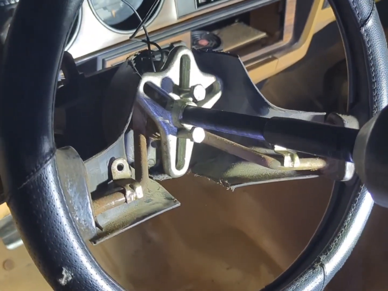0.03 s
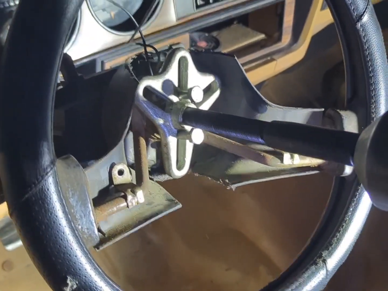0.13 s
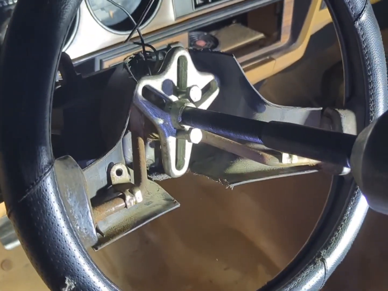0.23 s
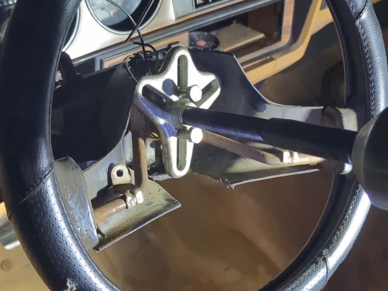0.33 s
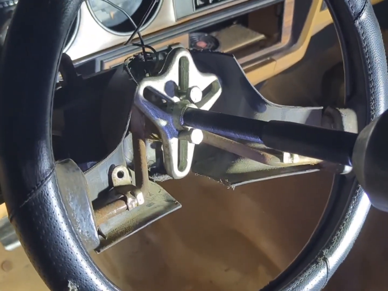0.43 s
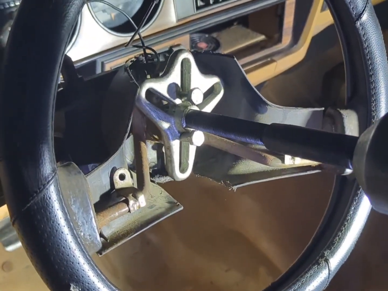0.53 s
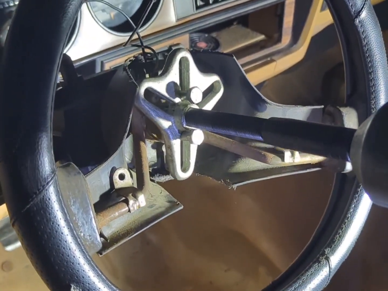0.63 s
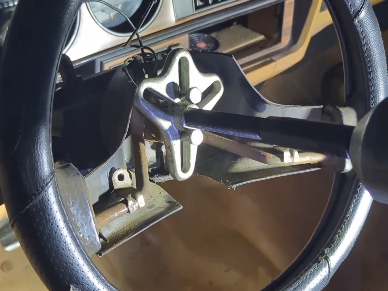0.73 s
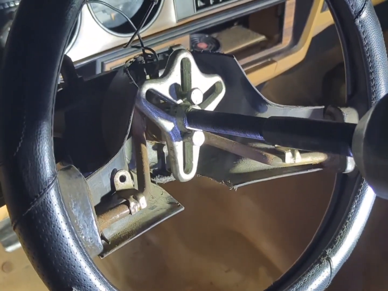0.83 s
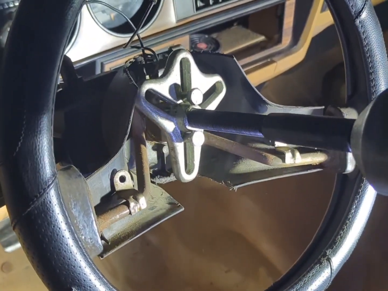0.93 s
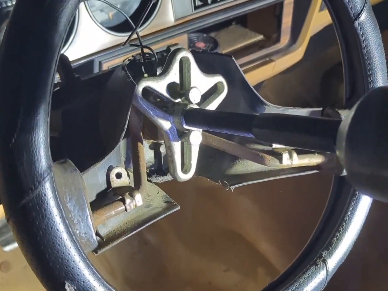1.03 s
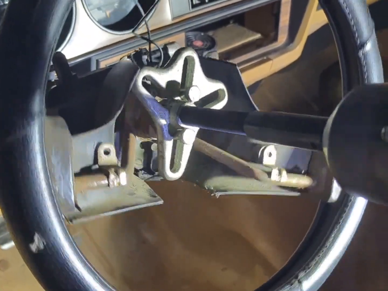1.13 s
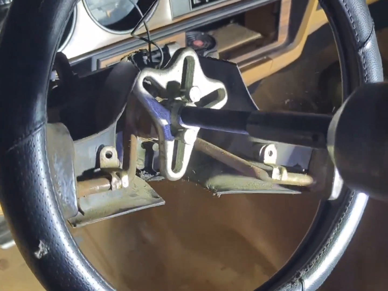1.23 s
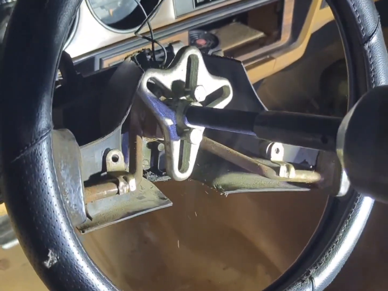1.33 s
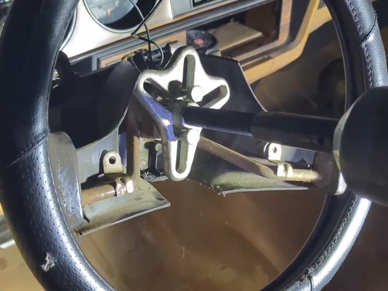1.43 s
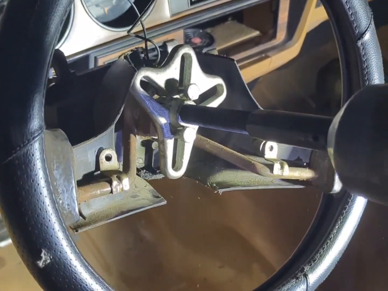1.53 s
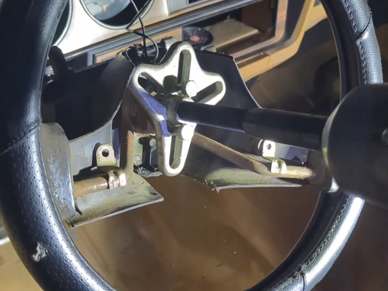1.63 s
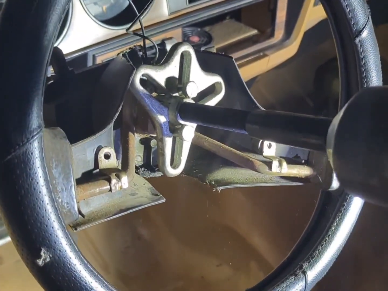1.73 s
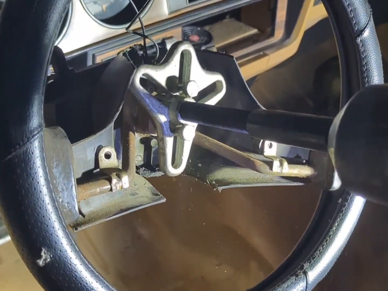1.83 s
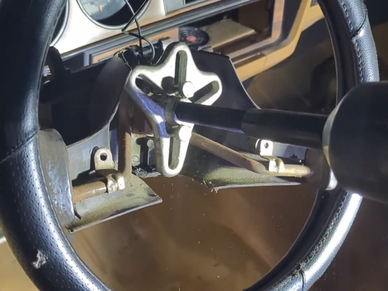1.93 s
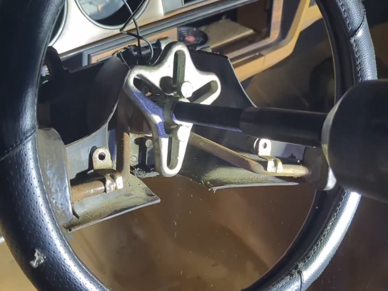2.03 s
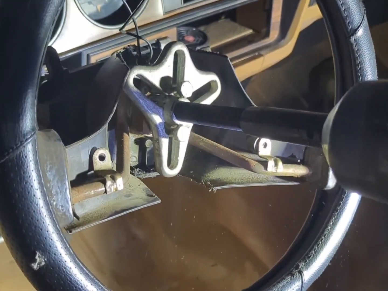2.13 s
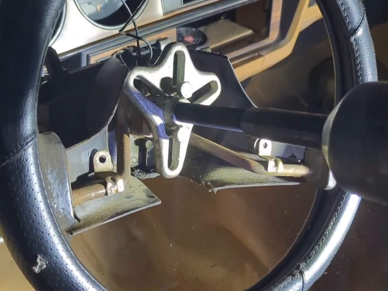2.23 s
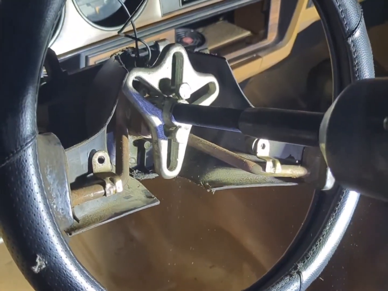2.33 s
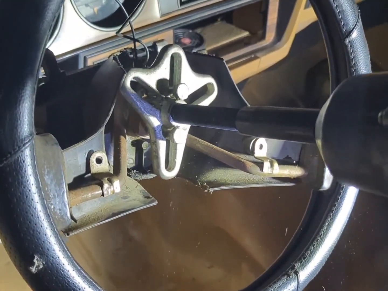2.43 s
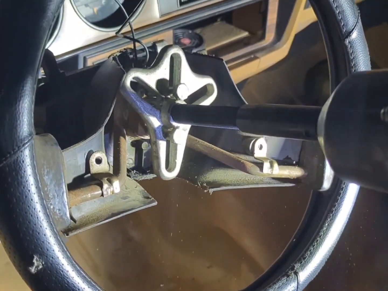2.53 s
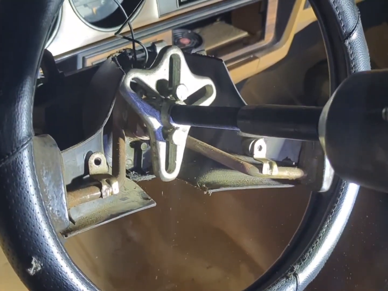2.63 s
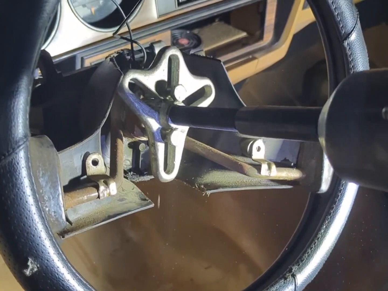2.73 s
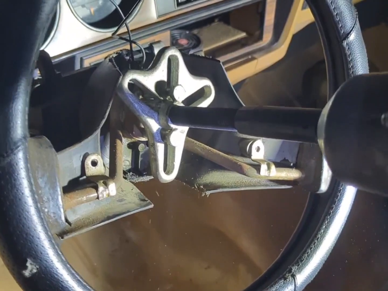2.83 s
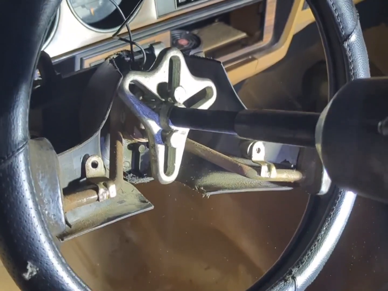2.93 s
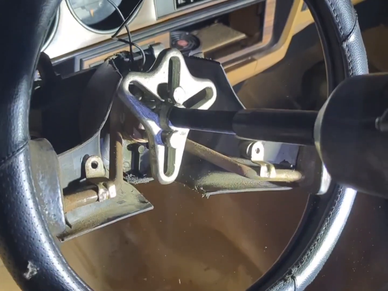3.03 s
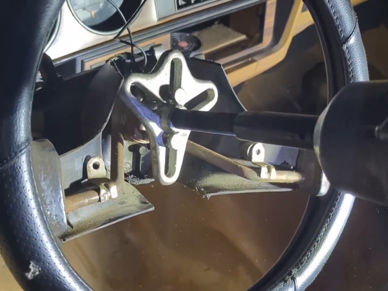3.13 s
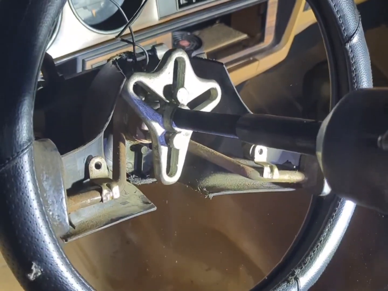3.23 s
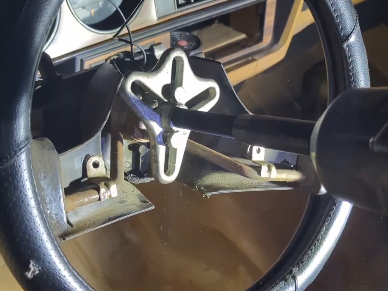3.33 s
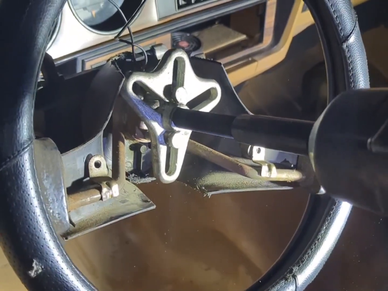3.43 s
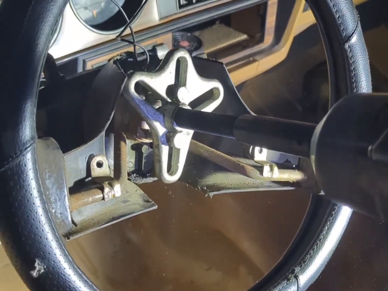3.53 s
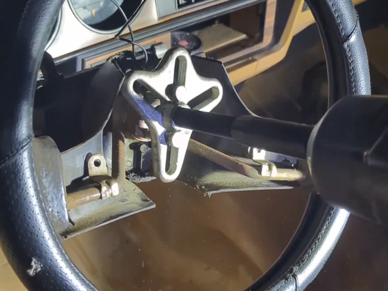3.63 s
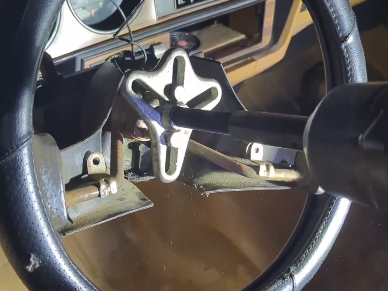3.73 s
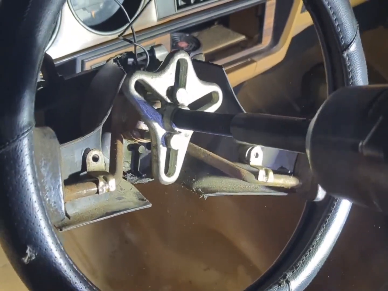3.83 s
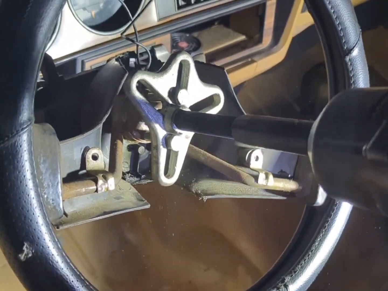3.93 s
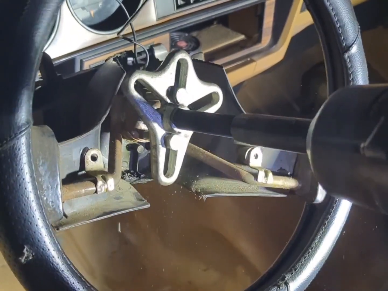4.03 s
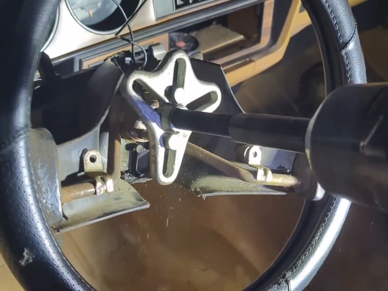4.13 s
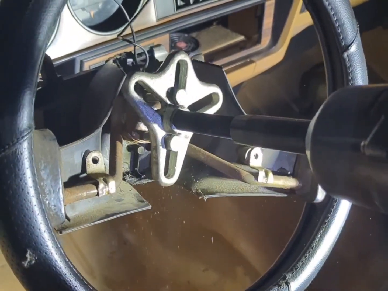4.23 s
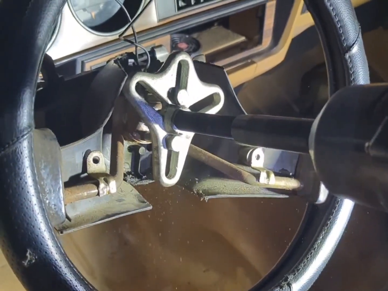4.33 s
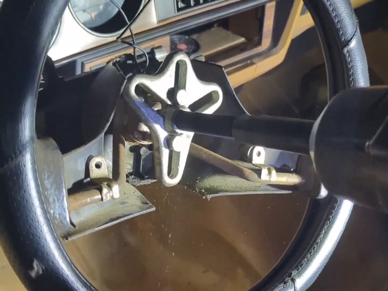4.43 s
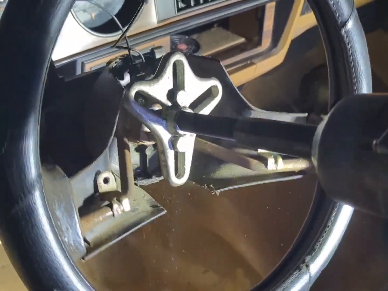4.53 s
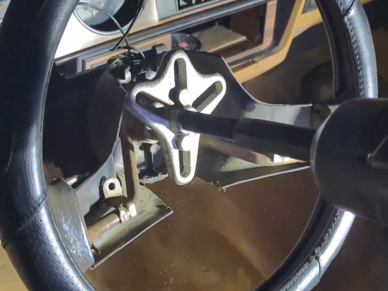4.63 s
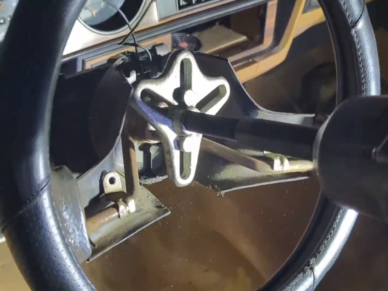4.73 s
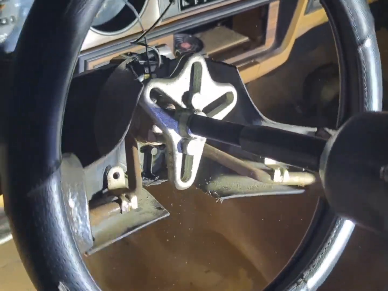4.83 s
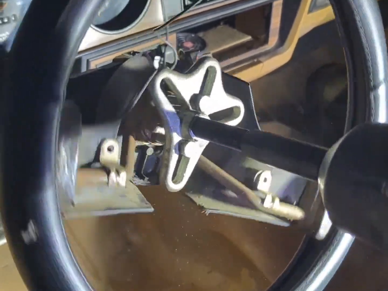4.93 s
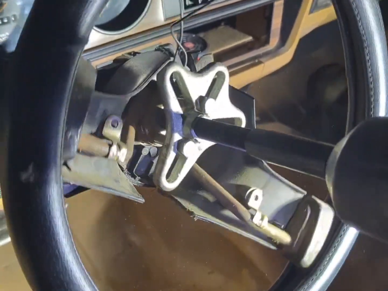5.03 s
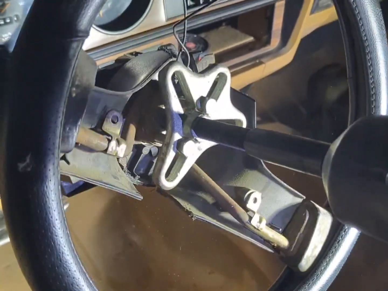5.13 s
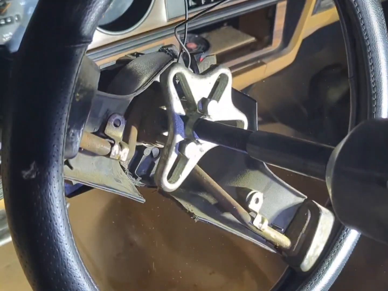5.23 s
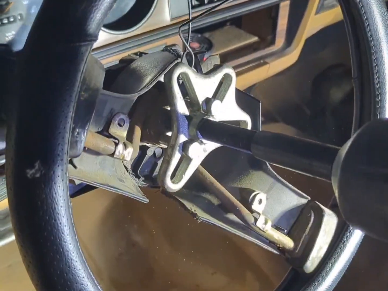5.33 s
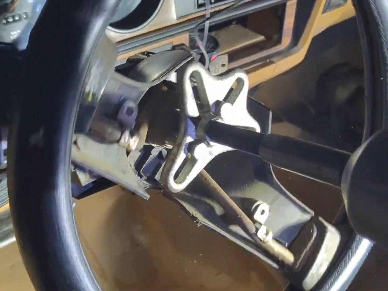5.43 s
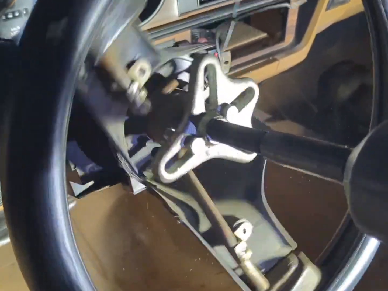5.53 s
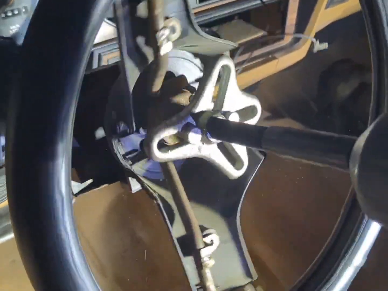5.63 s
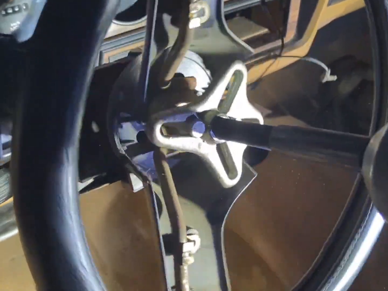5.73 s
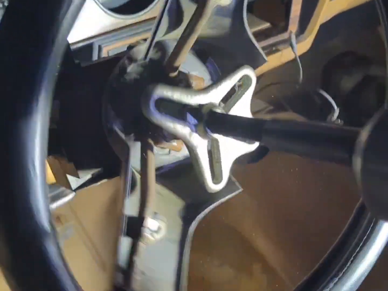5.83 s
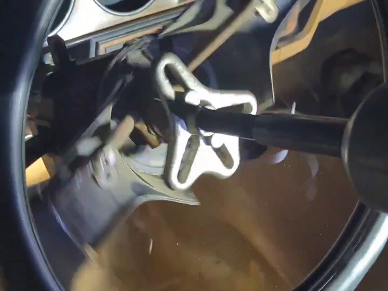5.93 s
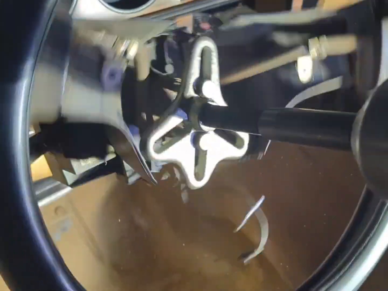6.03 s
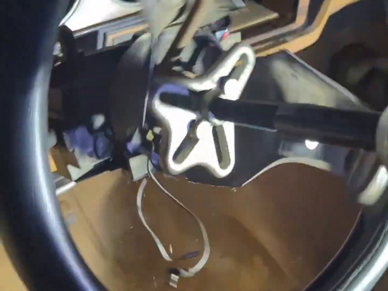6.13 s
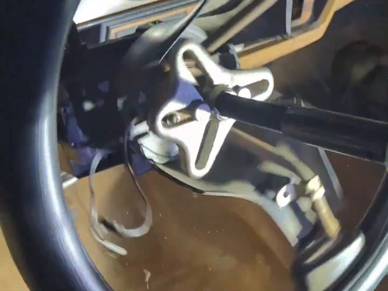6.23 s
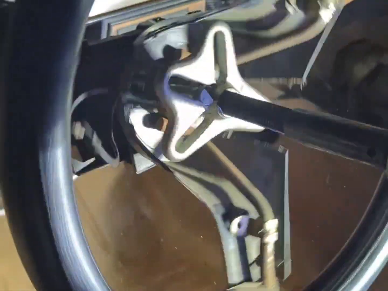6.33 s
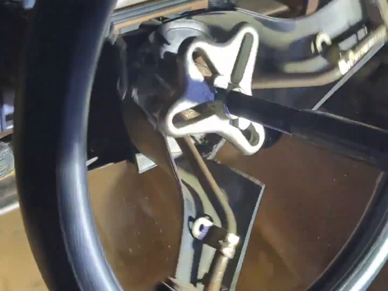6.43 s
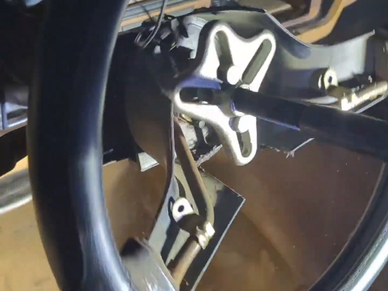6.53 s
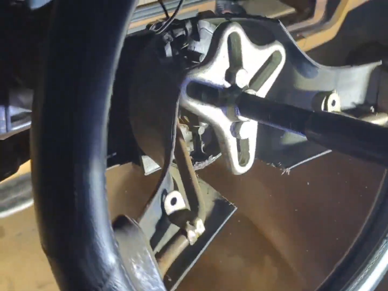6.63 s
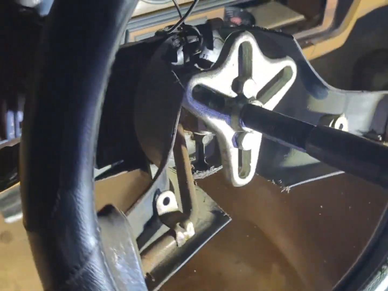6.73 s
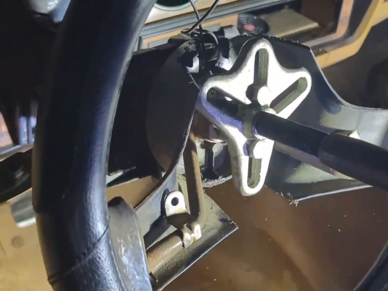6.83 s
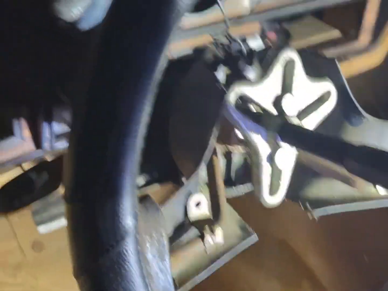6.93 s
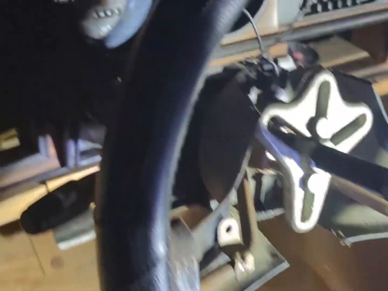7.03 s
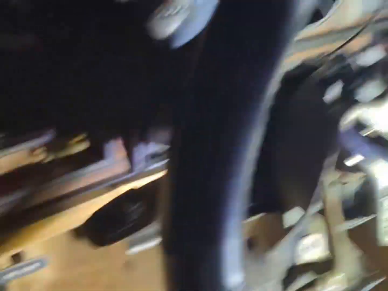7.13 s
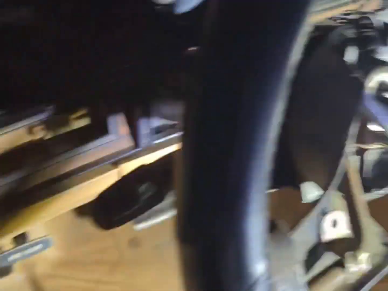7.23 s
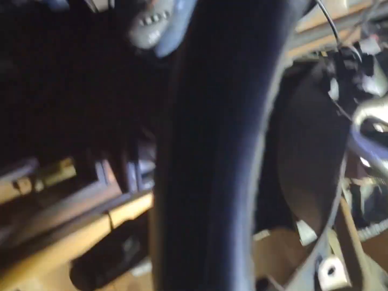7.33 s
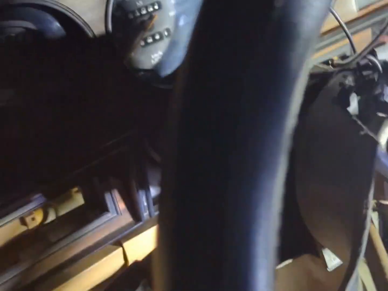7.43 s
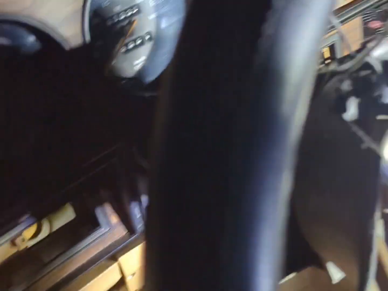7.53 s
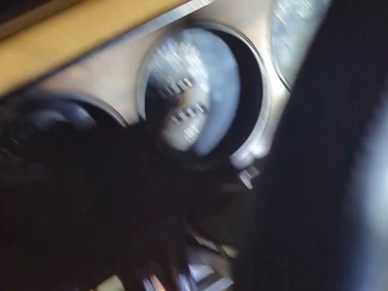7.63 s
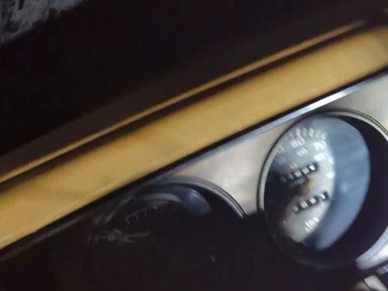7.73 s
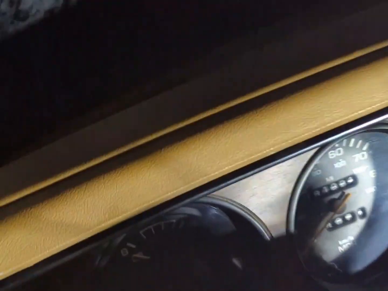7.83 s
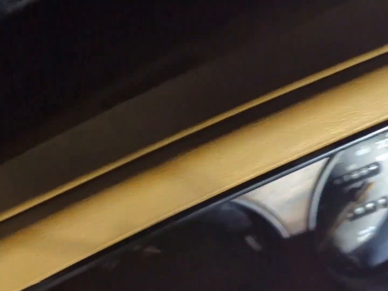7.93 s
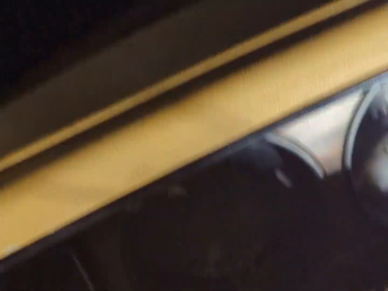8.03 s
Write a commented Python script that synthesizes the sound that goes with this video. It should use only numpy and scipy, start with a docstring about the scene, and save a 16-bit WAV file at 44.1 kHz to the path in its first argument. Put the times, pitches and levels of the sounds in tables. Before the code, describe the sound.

Electric motor whine, a brief rattling knock, a long harsh burst of metallic hammering, two short bursts, then a fading whir and light metal handling.

```python
"""A motor whines freely, then hammers in bursts with rattle and low boom; a hum, whir, clicks and rubs follow.
A cordless impact wrench turns the bolt of a steering-wheel puller inside a vehicle cab.
Shaft orders are sines; gears, steel, column and cloth are noise shaped by envelopes and resonances.
The freed wheel hums and whirs; the socket comes off with clicks and scrapes. A limiter ducks around loud blows."""
import sys
import numpy as np
from scipy import signal
from scipy.fft import rfft, irfft, next_fast_len
from scipy.io import wavfile
from scipy.ndimage import uniform_filter1d, minimum_filter1d

SR = 44100
rng = np.random.default_rng(int(sys.argv[2]) if len(sys.argv) > 2 else 0)


def inscribe(sig):
    """Save sig as 16-bit PCM at rate SR to the path in sys.argv[1].

    A 1-D sig is mono; a 2-D sig holds one channel per row.
    Samples are clipped to [-1, 1] before scaling.
    """
    pcm = np.round(np.clip(np.atleast_2d(sig).T, -1, 1) * 32767)
    wavfile.write(sys.argv[1], SR, pcm.astype(np.int16))


N = 356769
TIME = np.arange(N) / SR
HZ = np.fft.rfftfreq(8192, 1 / SR)

# Levels in spectra and modes are relative: body() scales each response to unit power.
# gear case spectrum: (frequency [Hz], level [dB])
GEAR_CASE = [(1500, -36), (2300, -16.5), (2720, -5.5), (3050, -9.5), (3400, -23.5), (5000, -43)]
# steel of socket, bolt and puller, spectrum: (frequency [Hz], level [dB])
STEEL = [(350, -1.5), (520, -3.5), (730, -5.5), (1050, -5), (1700, -3), (2700, -3), (3500, -6), (5000, -6),
         (6500, -9), (9000, -9), (15500, -15)]
# steel resonances: (frequency [Hz], width [Hz], boost [dB])
STEEL_MODES = [(1145, 21, 3.5), (1630, 56, 3.5), (1960, 40, 3), (2796, 99, -1.5), (655, 53, -1)]
# steering column spectrum: (frequency [Hz], level [dB])
COLUMN = [(60, -21), (85, -5), (130, -3.5), (220, -3.5), (280, -10.5), (430, -10.5), (560, -18.5),
          (850, -25.5), (2000, -35), (4000, -56.5)]
# steering column resonances: (frequency [Hz], width [Hz], boost [dB])
COLUMN_MODES = [(108.3, 6, 8), (148.2, 4.6, 7.5), (199.3, 12, 4.5), (241, 10, 4.5), (298.2, 8.2, 11.5)]
# bursts of hammering: (start [s], end [s], fall [dB/s], clatter [dB],
# treble relative to clatter [dB], column boom [dB])
BURSTS = [(1.346, 1.387, 541, -20.5, -1.5, -25.5), (1.75, 5.1, 168.5, -21.5, -3, -24),
          (5.637, 5.692, 424, -22.5, -5.5, -20.5), (5.9, 6.062, 420, -18, -6.3, -26)]
BURST_RISE_S = 0.01


def amp(db):
    """Decibels to gain."""
    return 10 ** (np.asarray(db) / 20)


def read(points, hz):
    """A spectrum joined by straight lines on a log-frequency axis."""
    point_hz, value = np.transpose(points)
    return np.interp(np.log(hz + 1), np.log(point_hz + 1), value)


def level(rows):
    """A (time, dB) curve as a gain, silent outside the curve."""
    time_s, db = np.transpose(rows)
    return amp(np.interp(TIME, time_s, db, left=-200, right=-200))


def swell(start, end, rise_s, fall_db_per_s):
    """A gain that rises linearly from start, holds until end and dies away exponentially."""
    fall_db = np.minimum(fall_db_per_s * np.maximum(TIME - end, 0), 200)
    return np.clip((TIME - start) / rise_s, 0, 1) * amp(-fall_db)


def add(mix, s, sound):
    """Mixes a stereo sound in at time s."""
    part = mix[:, round(s * SR):][:, :sound.shape[1]]
    part += sound[:, :part.shape[1]]


def noise():
    """Noise at two microphones: alike in the bass, nearly unrelated in the treble."""
    # (frequency [Hz], left-right correlation [1])
    likeness = [(30, 1), (100, 0.97), (190, 1), (300, 0.96), (480, 0.56), (700, -0.02), (1100, 0.37),
                (2500, 0.014), (16000, -0.15)]
    # (frequency [Hz], left minus right [dB])
    balance = [(150, 0), (300, -3), (600, -4.5), (1100, 1), (2200, 0.5), (4500, -.5), (9000, 0.2)]
    size = next_fast_len(N)
    hz = np.fft.rfftfreq(size, 1 / SR)
    a, b = rfft(rng.standard_normal((2, size)))
    same = np.clip(read(likeness, hz), -.99, .99)
    tilt = amp(read(balance, hz) / 2)
    mid = a * np.sqrt((1 + same) / 2)
    side = b * np.sqrt((1 - same) / 2)
    return irfft(np.array([(mid + side) * tilt, (mid - side) / tilt]), size)[:, :N]


def body(x, spectrum, modes=(), band=1):
    """Filters x by a minimum-phase response of unit power: a broad spectrum with resonances on it."""
    low_skirt = 1 + (spectrum[0][0] / (HZ + 1)) ** 6
    high_skirt = 1 + (HZ / spectrum[-1][0] / 1.2) ** 8
    gain = amp(read(spectrum, HZ)) * band / np.sqrt(low_skirt * high_skirt)
    for hz, width_hz, db in modes:
        gain = gain * np.sqrt(1 + (amp(db) ** 2 - 1) / (1 + (2 * (HZ - hz) / width_hz) ** 2))
    log_gain = np.log(gain / np.sqrt(np.mean(gain ** 2)) + 1e-5)
    mirrored = np.r_[log_gain, log_gain[-2:0:-1]]
    # the Hilbert transform of the log gain is the minimum phase
    response = np.fft.ifft(np.exp(np.conj(signal.hilbert(mirrored)))).real
    return signal.oaconvolve(x, response[None, :len(HZ)], axes=1)[:, :N]


def grains(per_s, spread_db, decay_s):
    """Envelope of many small random contacts, each dying quickly; mean power 1."""
    size = amp(spread_db * np.minimum(rng.exponential(1, N), 3))
    size = size * (rng.random(N) < per_s / SR)
    power = signal.lfilter([1], [1, -np.exp(-1 / (decay_s * SR))], size ** 2)
    return np.sqrt(power / power.mean())


def waver(per_s):
    """Random knots of unit deviation joined by straight lines, one curve per microphone."""
    knots = rng.standard_normal((2, int(N / SR * per_s) + 4))
    return np.array([np.interp(TIME * per_s, np.arange(len(k)), k) for k in knots])


def shifting(x, depth_db, width_hz=90, life_s=.06):
    """Patches of the spectrum swell and fade at random, at unchanged mean squared gain."""
    hop = 256
    z = signal.stft(x, nperseg=1024, noverlap=1024 - hop)[2]
    field = rng.standard_normal(z.shape)
    field = uniform_filter1d(field, max(1, round(width_hz * 1024 / SR)), axis=1)
    field = uniform_filter1d(field, max(1, round(life_s * SR / hop)), axis=2)
    gain = amp(depth_db * field / field.std())
    gain = gain / np.sqrt(np.mean(gain ** 2))
    return signal.istft(z * gain, nperseg=1024, noverlap=1024 - hop)[1][:, :N]


def lean(order):
    """Gain from how the wrench bears on the puller in the long burst; neutral outside the table."""
    # (time [s], boom [dB], treble of the chatter [dB], gear case [dB])
    bearing = np.array([(1.75, -1, -19, -1), (1.785, -7, 3, -3.5), (1.87, 2, -2, -5), (2.15, 2.5, -2, -4.5),
                        (2.56, -0.5, 0, 1.5), (2.66, -2, 0.5, -1.5), (3.8, -3, -0.5, -2),
                        (3.97, 2.5, -0.5, -4), (4.45, 2, -.5, -2.5), (4.9, -1, -6, -12), (5.1, 1.5, -1, -7),
                        (5.45, 12.5, 4, -6)])
    return amp(np.interp(TIME, bearing[:, 0], bearing[:, order], left=0, right=0))


def cab(cab_db=-56.5):
    """The quiet cab: steady noise, strongest in the bass."""
    # (frequency [Hz], level [dB])
    cab_spectrum = [(25, -2), (50, -2.5), (105, 0), (140, -7.5), (300, -16), (666, -13), (1050, -17.5),
                    (1300, -15), (2850, -25), (15500, -38.5)]
    return amp(cab_db) * body(noise(), cab_spectrum)


def motor(jitter=0.00098, flutter_db=3.5, gear_trim_db=1.0, case_trim_db=-1):
    """Shaft orders whine over meshing gears, whose case resonates under load; the speed controller sings."""
    # trigger pulls: (on [s], takes up the load [s], off [s], fall [dB/s], gear noise [dB],
    # gear case [dB], strain peak [dB])
    pulls = [(-.1, 1.29, 1.425, 607, -31.5, -32.5, -24.5), (1.699, 1.76, 5.1, 201, -33, -28.5, -17),
             (5.525, 5.565, 5.69, 382, -32.5, -29.5, -25), (5.871, 5.885, 6.08, 360, -25, -32, -26)]
    # unbraked motor: (time [s], shaft speed [Hz])
    free_shaft = [(0, 340.7), (.3, 341.7), (.68, 343), (.8, 341.8), (1.08, 345), (1.16, 340.5), (1.3, 328),
                  (1.75, 336)]
    # teeth and slots passing: (multiple of shaft speed [1], level [dB])
    whine_orders = [(3, -10.5), (7, -10.5), (8, -1.5), (9, -6.5), (18, -26.5), (21, -10), (22, -2.5),
                    (23, -27.5), (24, 5), (25, -21.5), (26, -18), (27, -8.5), (43, -28.5), (45, -8.5)]
    # meshing gears: (frequency [Hz], level [dB])
    gear_spectrum = [(30, -13), (50, 1.5), (90, -8.5), (150, -1.5), (260, -9.5), (420, -7.5), (650, -15),
                     (1000, -9), (1300, -14), (1600, -8.5), (2400, -8.5), (3400, -12.5), (9500, -16.5),
                     (15500, -26)]
    # gear resonances: (frequency [Hz], width [Hz], boost [dB])
    gear_modes = [(980, 76, 1), (1160, 49, 5.5), (210, 43, 4)]
    # speed controller, trigger part way down: (start [s], end [s], level [dB])
    chopper_spans = [(1.28, 1.46, -48), (1.476, 1.54, -44), (1.585, 1.73, -45), (5.517, 5.635, -45),
                     (5.861, 5.895, -45)]
    # (multiple of chopper_hz [1], level [dB])
    chopper_parts = [(.5, -33), (1, 0), (1.5, -23.5)]
    spin_up_s, hammer_sag_hz, coast_sag_hz = 0.017, 23.4, 150
    strain_rise_s, strain_fall_s = 0.074, .03  # the case swells while the hammer spring winds up
    whine_db, full_speed_hz, whine_db_per_hz = -39.5, 343.1, 0.54  # the whine fades as the shaft slows
    chopper_hz, chopper_rise_s, chopper_fall_db_per_s = 7860, 0.0076, 450

    running = gear_level = case_level = 0
    for on, loaded, off, fall, mesh_db, ring_db, strain_db in pulls:
        run = swell(on, off, spin_up_s, fall)
        strain = np.exp(-np.maximum((loaded - TIME) / strain_rise_s, (TIME - loaded) / strain_fall_s))
        running = running + run
        gear_level = gear_level + run * amp(mesh_db)
        case_level = case_level + run * (amp(ring_db) + amp(strain_db) * strain)
    case_level = case_level * running * lean(order=3)

    braking = sum(swell(start, end, BURST_RISE_S, fall) for start, end, fall, *_ in BURSTS)
    shaft_hz = np.interp(TIME, *np.transpose(free_shaft))
    shaft_hz = shaft_hz - hammer_sag_hz * braking - coast_sag_hz * (1 - running)
    whine_level = running * amp(whine_db + whine_db_per_hz * (shaft_hz - full_speed_hz))
    turns = np.cumsum(shaft_hz * (1 + jitter * waver(60)[0])) / SR
    whine = 0
    for multiple, db in whine_orders:
        flutter = amp(db + flutter_db * waver(25))
        whine = whine + flutter * np.sin(2 * np.pi * (multiple * turns + rng.random()))

    mesh = shifting(noise() * grains(2500, 1.5, 0.0018), depth_db=4.0, width_hz=70)
    gears = body(mesh, gear_spectrum, gear_modes)
    case = body(noise() * grains(1000, 0.74, 0.0022), GEAR_CASE, [(2730, 40, 3.1)])
    case = shifting(case, depth_db=4.0, width_hz=60, life_s=.08)

    chopper = chopper_level = 0
    mic_phase = np.array([[0], [.1]])  # cycles
    for multiple, db in chopper_parts:
        cycles = multiple * chopper_hz * TIME + mic_phase
        chopper = chopper + np.sqrt(2) * amp(db) * np.sin(2 * np.pi * cycles)
    for start, end, db in chopper_spans:
        chopper_level = chopper_level + amp(db) * swell(start, end, chopper_rise_s, chopper_fall_db_per_s)
    return (amp(gear_trim_db) * gears * gear_level + amp(case_trim_db) * case * case_level
            + whine * whine_level + chopper * chopper_level)


def clicks(click_trim_db=2, tick_s=0.0015, wash_db=-13, wash_s=0.026, ring_trim_db=-12, bright_hz=4000):
    """Light metal contacts: a noise tick, its reflections as a noise tail, and the socket's ringing modes."""
    # loose metal touching: (time [s], level [dB], ring share [dB], brightness [dB])
    touches = [(0.575, -25, -18, -13), (1.534, -46, -10, -8), (1.572, -47.5, -8, -8), (5.457, -45, -14, 3),
               (5.487, -45, -6, 2), (5.5332, -31, -22, -8), (5.558, -6, 1, -19), (5.771, -24.5, -5.5, -22),
               (6.208, -40.5, -7, -6), (6.5991, -25.5, -10, 1.5), (6.762, -43, -11, -1),
               (6.781, -34.5, -8, -2), (6.803, -46, -9, 0), (7.0112, -47, -14, -4), (7.084, -35, -13, 7.5),
               (7.1124, -28, -17, 3), (7.48, -45, -4, -3), (7.8652, -47, -14, -6)]
    # (frequency [Hz], level [dB])
    touch_spectrum = [(400, -7), (1100, -3), (1700, -1), (2400, -4), (3400, -3.5), (5000, -9.5),
                      (9000, -13), (15000, -28)]
    # (frequency [Hz], width [Hz], boost [dB])
    touch_modes = [(2530, 120, 5.5), (3550, 320, 8)]
    # ringing socket: (frequency [Hz], level [dB], 60 dB decay time [s])
    socket_modes = [(1750, 1.5, 0.15), (2170, 8, .09), (2440, -14, 0.212), (3170, -7, 0.126),
                    (3530, -3, .12), (4387, -13, .2), (4950, -11, .15), (7850, -18, .15), (8463, -14, .15)]
    ticks, rings = np.zeros((2, N)), np.zeros((2, N))
    t = TIME[:SR // 3]
    hiss = noise()
    shape = np.exp(-t / tick_s) + amp(wash_db) * np.exp(-t / wash_s)
    for s, db, share_db, bright_db in touches:
        tick = np.roll(hiss, -round(s * SR), axis=1)[:, :len(t)] * shape
        dull = signal.lfilter(*signal.butter(1, bright_hz, fs=SR), tick)
        add(ticks, s, amp(db) * (dull + amp(bright_db) * (tick - dull)))
        ring = 0
        for hz, mode_db, t60_s in socket_modes:
            tone = np.sin(2 * np.pi * (hz * t + rng.random((2, 1))))
            ring = ring + amp(mode_db - 60 * t / t60_s) * tone
        add(rings, s, amp(db + share_db + ring_trim_db) * ring)
    return amp(click_trim_db) * body(ticks, touch_spectrum, touch_modes) + rings


def column(steady_sway_db=-36):
    """Hammering and single jolts shake the low modes of the steering column; their powers add."""
    # (start [s], length [s], boom [dB], sway [dB])
    jolts = [(1.292, 0.022, -23, -34), (1.376, 0.055, -23, -24.5), (2.057, .09, -20, -31),
             (4.635, 0.022, -18.5, -25.5), (4.855, .03, -23, -24), (4.97, 0.03, -21.5, -25),
             (5.095, 0.062, -20, -26.5), (5.555, 0.057, -21.5, -36), (5.67, .045, -22, -28),
             (5.9, .02, -21, -47), (6.041, 0.051, -16.5, -38)]
    # (frequency [Hz], level [dB])
    sway_spectrum = [(20, -29.5), (33, -13.5), (42, 1.5), (50, 5.5), (62, 2), (72, -5.5), (95, -16.5)]
    rise_s, boom_fall_db_per_s, sway_fall_db_per_s = 0.013, 149, 51
    after_ring_db, after_ring_fall_db_per_s = -14, 38.5  # the column rings on faintly
    shakes = [(start, end, db, steady_sway_db, lean(order=1)) for start, end, _, _, _, db in BURSTS]
    shakes += [(s, s + length_s, db, sway_db, 1) for s, length_s, db, sway_db in jolts]
    boom_power = sway_power = 0
    for start, end, boom_db, sway_db, contact in shakes:
        ring = swell(start, end, rise_s, boom_fall_db_per_s) ** 2
        ring += (amp(after_ring_db) * swell(start, end, rise_s, after_ring_fall_db_per_s)) ** 2
        boom_power = boom_power + (amp(boom_db) * contact) ** 2 * ring
        sway_power = sway_power + (amp(sway_db) * swell(start, end, rise_s, sway_fall_db_per_s)) ** 2
    boom = body(noise() * grains(900, 2.8, 0.0025), COLUMN, COLUMN_MODES) * np.sqrt(boom_power)
    sway = body(noise(), sway_spectrum) * np.sqrt(sway_power)
    return boom + sway


def rattle(clatter_trim_db=2.0, fizz_trim_db=4.0, split_hz=6000):
    """Socket, bolt and puller chatter as dense noise grains; late in the long burst the puller rings."""
    # puller ringing as its load comes off: (time [s], level [dB])
    sing_curve = [(4.55, -60), (4.7, -23), (4.8, -17), (4.9, -18), (5.0, -39), (5.12, -38), (5.3, -57)]
    # (frequency [Hz], width [Hz], boost [dB])
    sing_modes = [(3220, 92, 29.5), (1122, 38, 18), (1690, 34, 11.5), (2290, 60, 11), (4600, 250, 6)]
    shaking = treble = 0
    for start, end, fall, db, treble_db, _ in BURSTS:
        burst = amp(db) * swell(start, end, BURST_RISE_S, fall)
        shaking = shaking + burst
        treble = treble + amp(treble_db) * burst
    contacts = grains(1100, 2.0, 0.0021)
    chatter = noise() * contacts
    low = 1 / np.sqrt(1 + (HZ / split_hz) ** 8)
    high = np.sqrt(1 - low ** 2)
    clatter = body(shifting(chatter, depth_db=4), STEEL, STEEL_MODES, low) * shaking
    fizz = body(shifting(noise() * contacts, depth_db=6.0), STEEL, band=high)
    fizz = fizz * treble * lean(order=2)
    sing_spectrum = [(500, -20), (1000, 4), (4500, -11), (8000, -33)]  # (Hz, dB)
    sing = body(noise() * grains(200, 1.7, 0.01), sing_spectrum, sing_modes)
    sing = (sing - .5 * sing[::-1]) * level(sing_curve)  # partly opposite phase at the two microphones
    return amp(clatter_trim_db) * clatter + amp(fizz_trim_db) * fizz + sing


def strikes(slip_count=9):
    """Every strike as (s, dB): hard blows, a lighter beat and rebounds inside bursts, and the last slips."""
    # hardest blows of hammer on anvil: (time [s], level [dB])
    hard_blows = [(1.3532, -10), (1.382, -9), (1.783, 0.5), (1.834, -2), (1.8793, -10), (1.9646, -6),
                  (2.103, -7), (2.2447, -4), (2.354, -8), (2.4069, -1.5), (2.4991, -2), (2.654, -1),
                  (2.7109, -8), (2.8942, -4), (2.9338, -11), (3.0377, -7.5), (3.1006, -5.5), (3.1964, -6.5),
                  (3.2358, -10.5), (3.3364, -6), (3.386, -4.5), (3.4465, -7), (3.486, -2), (3.5996, -4),
                  (3.785, -10.5), (3.864, -2.5), (4.11, 1.5), (4.1868, -9.5), (4.2812, -6), (4.323, -8.5),
                  (4.4373, -0.5), (4.489, -9), (4.568, -1), (4.8936, -12.5), (4.9987, -6), (5.0705, -4),
                  (5.1022, -8), (5.5567, -5), (5.6408, -5.5), (5.877, -19), (5.906, -5), (5.9607, -9),
                  (6.0068, -8.5), (6.04, -15)]
    beat_per_s, beat_db, spread_db = 21, -11.5, 3
    rebound_s, rebound_db = .0098, -11.5  # one bounce after a blow
    # after the long burst the hammer slips over the anvil, ever slower and softer
    slip_start_s, slip_gap_s, slip_slowing = 5.148, .0222, 1.028
    slip_db, slip_fall_db_per_s = -12.5, 90
    blows = list(hard_blows)
    chance = rng.standard_normal((len(hard_blows), 16, 2))
    for (s, _), (next_s, _), draws in zip(hard_blows, hard_blows[1:], chance):
        if any(start < s and next_s < end for start, end, *_ in BURSTS):
            steps = max(round((next_s - s) * beat_per_s), 1)
            beats = np.linspace(s, next_s, steps + 1)[:-1]
            blows += [(at, beat_db + spread_db * z) for at, z in zip(beats[1:], draws[:, 0])]
            blows += [(at + rebound_s, rebound_db + spread_db * z) for at, z in zip(beats, draws[:, 1])]
    slips = np.r_[0, np.cumsum(slip_gap_s * slip_slowing ** np.arange(slip_count - 1))]
    return blows + [(slip_start_s + s, slip_db - slip_fall_db_per_s * s) for s in slips]


def hammer(blow_trim_db=3.0, crack_s=0.0022, tail_db=-17, tail_s=0.036, thud_trim_db=-5, ping_trim_db=-5):
    """Each blow: a steel crack, a short wash of cab reflections, a gear-case ping and a column thud."""
    # gear case rung by a blow: (frequency [Hz], width [Hz], boost [dB])
    ping_modes = [(2710, 27, 11), (2960, 37, 10)]
    hits = np.zeros(N)  # power
    for s, db in strikes():
        hits[round(s * SR)] += amp(db) ** 2
    t = TIME[:SR // 5]
    power_shape = np.exp(-2 * t / crack_s) + amp(tail_db) ** 2 * np.exp(-2 * t / tail_s)
    power = np.maximum(signal.oaconvolve(hits, power_shape)[:N], 0)
    force = noise() * np.sqrt(power)
    ping = amp(ping_trim_db) * lean(order=3) * body(force, GEAR_CASE, ping_modes)
    thud = amp(thud_trim_db) * lean(order=1) * body(force, COLUMN, COLUMN_MODES)
    return amp(blow_trim_db) * body(force, STEEL, STEEL_MODES) + ping + thud


def wheel(whir_half_width_hz=280):
    """The spinning wheel hums in the column; its bearing whirs, a noise band gliding down as it slows."""
    # (frequency [Hz], level [dB])
    hum_spectrum = [(40, -5.5), (55, 9.5), (75, -23), (110, -6), (300, -15), (450, -15.5), (800, -37.5)]
    # (frequency [Hz], width [Hz], boost [dB])
    hum_modes = [(105.9, 6.6, 22), (181.7, 7.6, 16), (228, 6.7, 12), (271, 8, 12), (296.6, 7, 13.5),
                 (352.78, 12, 9)]
    start_s, push_s = 6.05, 0.16
    hum_db, hum_fall_db_per_s, whir_db, whir_fall_db_per_s = -27, 25, -51, 34
    whir_start_hz, whir_end_hz, slowing_s = 1860, 760, 0.45
    let_go_s = start_s + push_s
    slowing = np.exp(-np.maximum(TIME - let_go_s, 0) / slowing_s)
    whir_hz = whir_end_hz + (whir_start_hz - whir_end_hz) * slowing
    hum = body(noise(), hum_spectrum, hum_modes) * swell(start_s, let_go_s, push_s, hum_fall_db_per_s)
    lowpass = signal.butter(2, whir_half_width_hz, fs=SR, output="sos")
    roughness = signal.sosfilt(lowpass, rng.standard_normal((2, N)))
    carrier = np.sqrt(2) * np.cos(2 * np.pi * np.cumsum(whir_hz) / SR)
    whir = roughness / roughness.std() * carrier * swell(start_s, let_go_s, push_s, whir_fall_db_per_s)
    return amp(hum_db) * hum + amp(whir_db) * whir


def handling(sleeve_trim_db=1, slips_per_s=72, unevenness=.35, slip_s=0.0081):
    """The socket scrapes in a quick, uneven train of small ringing slips; cloth brushes past."""
    # strokes of socket and sleeve: (start [s], end [s], rise [s], fall [dB/s], scraping [dB], rubbing [dB])
    strokes = [(6.753, 6.79, .03, 300, -47, -63), (6.837, 7.002, 0.14, 43, -44, -62),
               (7.08, 7.133, .04, 120, -53, -50), (7.25, 7.37, .1, 140, -75, -48),
               (7.47, 7.507, .03, 130, -54.5, -52), (7.535, 7.655, 0.044, 350, -68, -58.5),
               (7.748, 7.8, .04, 90, -65, -64.5), (7.973, 8.09, .04, 102, -65, -61)]
    # (frequency [Hz], level [dB])
    scrape_spectrum = [(500, -25), (900, -15), (1150, -3.5), (1700, 0.5), (2400, -6.5), (3100, -3),
                       (3600, -9), (4300, -7.5), (8000, -20)]
    # (frequency [Hz], level [dB])
    sleeve_spectrum = [(300, -16), (1000, -6), (4500, -1), (9000, -1), (15000, -5.5)]
    scraping = rubbing = 0
    for start, end, rise_s, fall, metal_db, cloth_db in strokes:
        stroke = swell(start, end, rise_s, fall)
        scraping = scraping + amp(metal_db) * stroke
        rubbing = rubbing + amp(cloth_db) * stroke
    cycles = np.cumsum(slips_per_s * (1 + unevenness * waver(40)[0])) / SR
    stick_slip = np.exp(-(cycles % 1) / (slips_per_s * slip_s))
    stick_slip = stick_slip / np.sqrt(np.mean(stick_slip ** 2))
    slips = noise() * stick_slip * grains(900, 1.2, 0.0032)
    slips = shifting(slips, depth_db=4.5, width_hz=130, life_s=0.14)
    scrape = body(slips, scrape_spectrum, [(3100, 140, 3.7), (3500, 200, 8.5)]) * scraping
    sleeve = body(noise() * grains(2000, 2.2, 0.0019), sleeve_spectrum) * rubbing
    return scrape + amp(sleeve_trim_db) * sleeve


def scene():
    """The wrench, what it shakes, and the quiet cab."""
    return motor() + hammer() + rattle() + column() + wheel() + clicks() + handling() + cab()


def record(dry, threshold_db=-13, slope=0.78, ceiling=.92, edge_hz=15800):
    """A look-ahead limiter ducks everything for some milliseconds around loud blows; then the band limit."""
    sensed = signal.lfilter(*signal.butter(1, 350, "high", fs=SR), dry)  # reacts little to bass
    power = abs(uniform_filter1d((sensed ** 2).mean(0), size=70))
    power_db = 10 * np.log10(power + 1e-12)
    gain_db = -slope * np.maximum(power_db - threshold_db, 0)
    held_db = minimum_filter1d(gain_db, size=440)  # centred window: ducks ahead of the blow
    limited = dry * amp(uniform_filter1d(held_db, size=180))
    limited = limited / (1 + (limited / ceiling) ** 8) ** (1 / 8)  # rounds off the tallest peaks
    lowpass = signal.firwin(301, edge_hz, window=("kaiser", 9), fs=SR)
    return signal.oaconvolve(limited, lowpass[None], "same")


dry = scene()
out = record(dry)
inscribe(out)
```